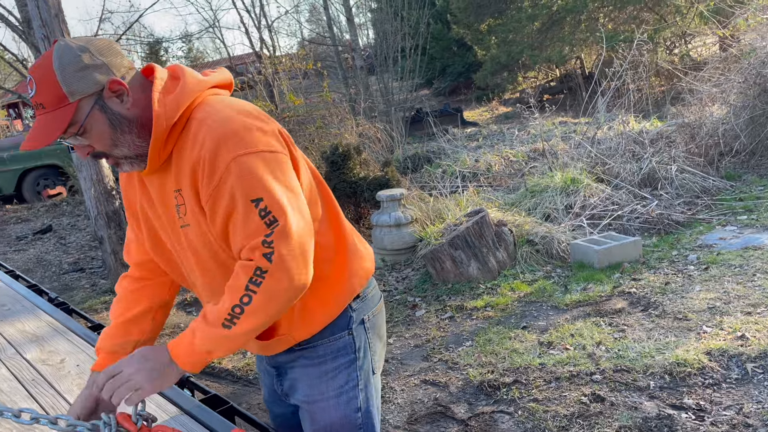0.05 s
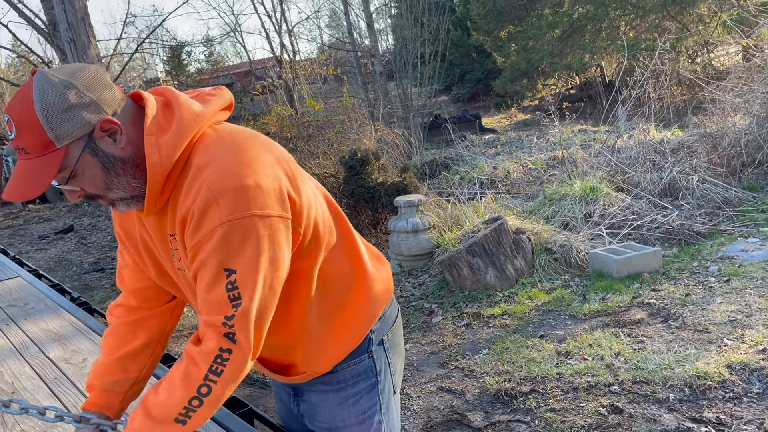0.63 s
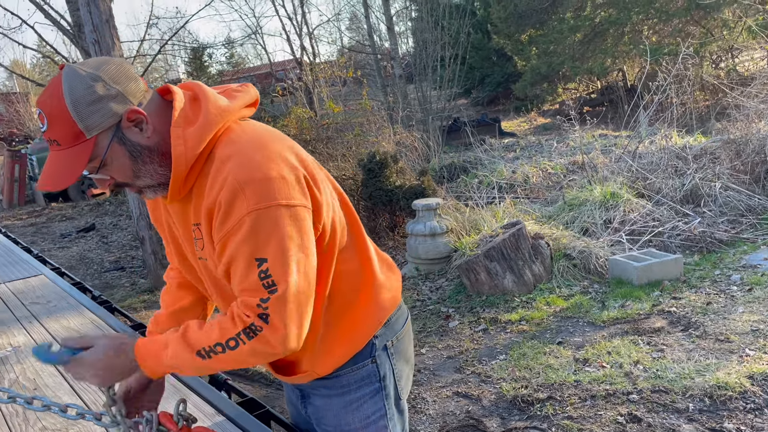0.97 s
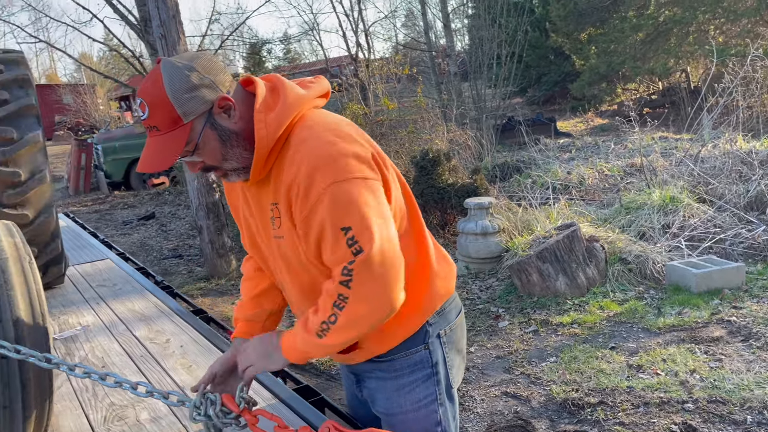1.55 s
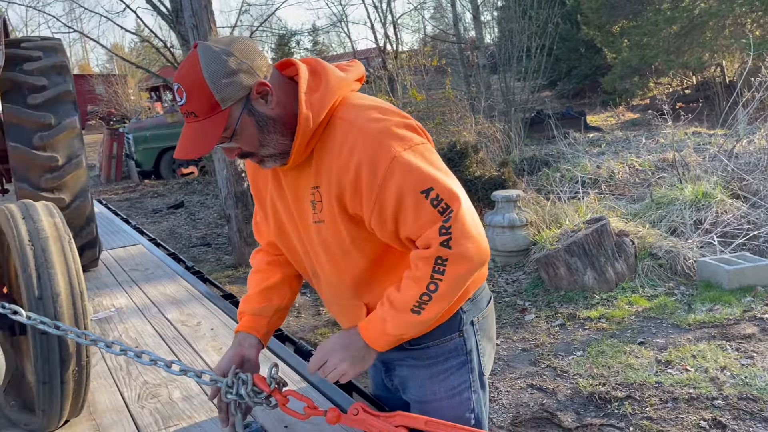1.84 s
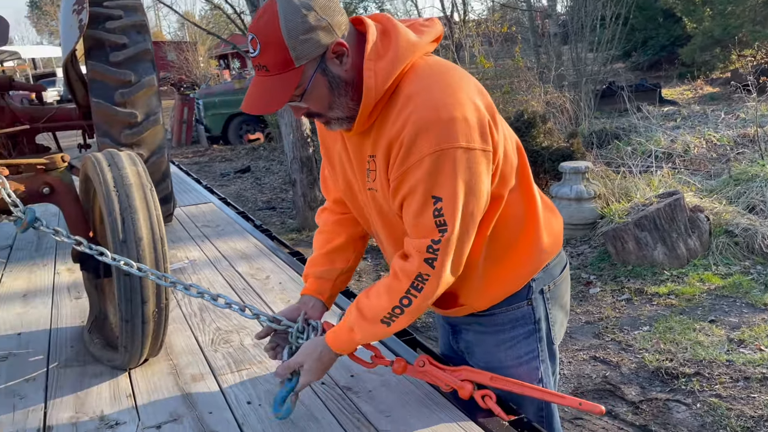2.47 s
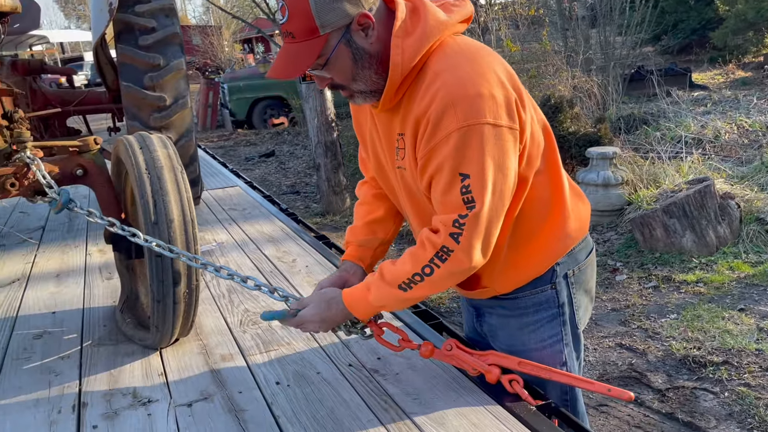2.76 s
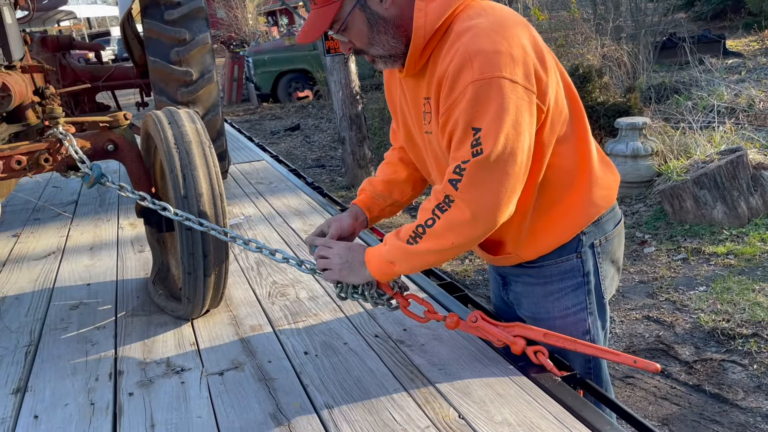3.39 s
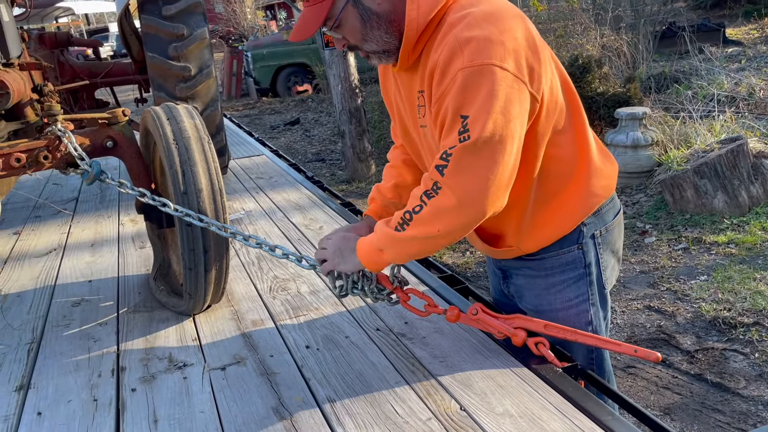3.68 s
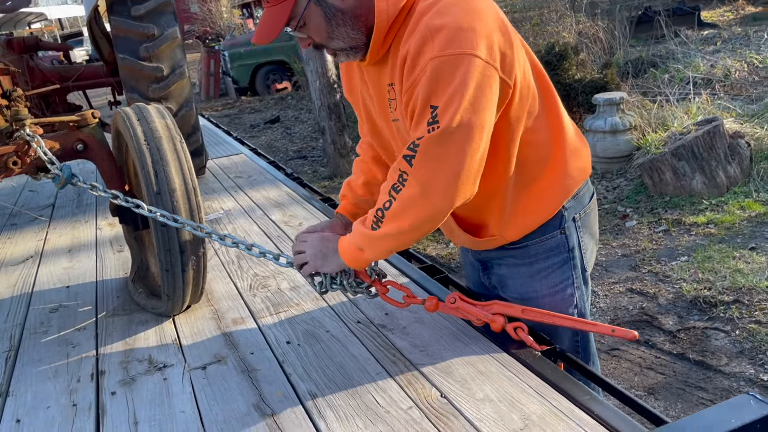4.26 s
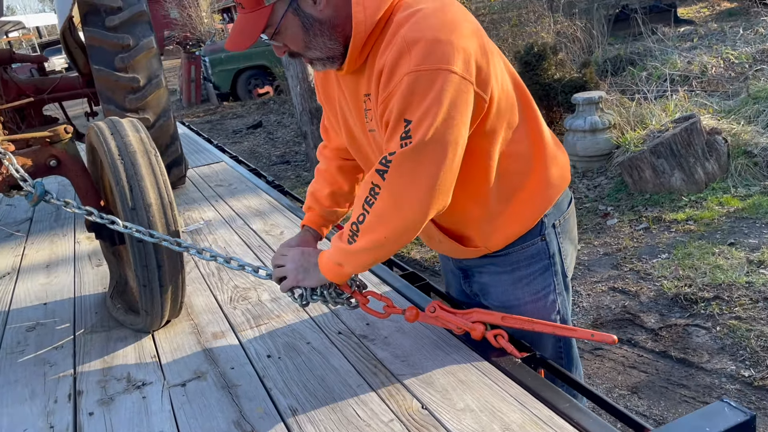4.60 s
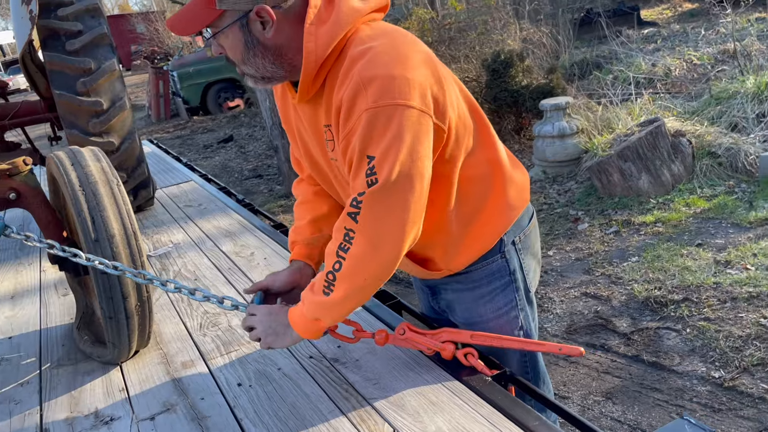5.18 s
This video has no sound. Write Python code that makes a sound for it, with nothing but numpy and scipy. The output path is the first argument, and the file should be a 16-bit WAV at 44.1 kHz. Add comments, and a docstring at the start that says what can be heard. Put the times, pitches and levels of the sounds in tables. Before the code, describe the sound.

A steel tie-down chain is handled close to the microphone, outdoors over a faint low rumble. In the first half second, the chain and binder knock and drag on a wooden trailer deck, which booms hollowly while links clink. Scattered clicks and a short scrape follow between 0.6 and 1.3 seconds. At about 1.35 seconds comes the loudest thump, deep and resonant, with smaller knocks and bright jingling until 1.7 seconds. A sharp metal clank lands at 2 seconds amid soft knocks and the rubbing of hands along the chain. After a quieter moment, another crisp clink sounds at 3 seconds, then lighter irregular clicks from 3.5 to 4.5 seconds, the hook ringing briefly after each contact. A small rattle and scrape around 4.8 seconds and a few light ticks close it.

```python
"""Outdoors at a wooden trailer deck, close up on a phone's two microphones.
A steel tie-down chain is handled and hooked up: held links click, free links ring, sliding links
scrape, and the hook and binder sing briefly after each contact. The heavy chain and binder knock
and drag on the deck, which booms with bending waves. Faint open-air rumble lies underneath."""
import sys
import numpy as np
from scipy import signal
from scipy.fft import rfft, irfft, next_fast_len
from scipy.io import wavfile

SR = 44100
rng = np.random.default_rng(int(sys.argv[2]) if len(sys.argv) > 2 else 0)


def put_to_file(sound):
    """Save the sound as 16-bit audio at rate SR, in the file named by the first command-line argument."""
    columns = np.atleast_2d(sound).T  # one column per channel
    safe = np.clip(columns, -1, 1)
    whole_steps = np.round(safe * 32767)
    wavfile.write(sys.argv[1], SR, whole_steps.astype(np.int16))


N = 230904

# links, and twice the hook, left free to ring: t/s, level/dB, t60/s, lead mode/Hz, second mode/Hz
FREE_RINGS = [(.092, -41.5, 0.13, 4400, 6350), (.174, -25, 0.037, 4410, 8500),
              (.273, -41, 0.067, 4390, 4880), (.453, -51, 0.44, 11600, 8210),
              (.455, -52.5, 0.37, 4440, 4740), (.528, -29.5, 0.032, 4860, 6530),
              (1.050, -30.5, 0.017, 13100, 8900), (1.358, -41, 0.093, 9300, 14500),
              (1.454, -46, 0.22, 4387, 6600), (1.486, -38.5, 0.079, 9050, 11630),
              (1.512, -34, 0.052, 9300, 11200), (1.513, -52.5, 0.5, 4420, 4840),
              (1.634, -48.5, 0.13, 9400, 11350), (1.671, -56.5, 0.064, 4470, 9470),
              (2.036, -44, 0.14, 4530, 6780), (2.036, -55, 0.13, 14400, 10300),
              (2.141, -45, 0.13, 4880, 10100), (2.214, -62, 0.091, 6630, 4387),
              (2.333, -38, 0.042, 8750, 9400), (3.017, -25, 0.043, 11487, 4850),
              (3.048, -33.5, 0.043, 4360, 11100), (3.120, -54, 0.026, 11487, 4960),
              (3.550, -36, 0.06, 4680, 9500), (3.790, -35, 0.039, 3055, 2420),
              (3.893, -36.5, 0.024, 2116, 2580)]
# modes of the deck: f/Hz, level/dB, t60/s
DECK_MODES = [(124.97, -1.5, 0.91), (208, -27, 0.27), (247.4, 1.5, 0.64), (310, -9.5, 0.22),
              (413, -8.5, 0.76), (465, -4, 0.25), (563, -7, 0.46), (698, -0.5, 0.22), (840, -3.5, 0.14),
              (850, -8.5, 0.28), (1240, 1.5, 0.069), (1307, -11, 0.33), (1620, -17, 0.34)]
# spectrum of the booming deck: f/Hz, level/dB
BOOM_SPECTRUM = [(40, -21), (85, -13), (125, 2.5), (160, -2), (190, 2), (245, 6.5), (450, -4.5), (900, -3),
                 (1500, -4.5), (2500, -9), (5000, 2)]
# short-lived modes of the hook and binder: f/Hz, level/dB
HOOK_MODES = [(2170, 0), (2420, -8), (2840, -8.5), (3010, -3), (3130, -2.5), (3350, -7.5), (6590, -34.5)]


def undb(db):
    """Decibels to gain."""
    return 10 ** (np.asarray(db) / 20)


def unit(x):
    """Scale to rms 1."""
    return x / np.sqrt(np.mean(x ** 2) + 1e-20)


def seconds(length):
    """Time axis of the given length."""
    return np.arange(int(length * SR)) / SR


def fade(t, t60):
    """Exponential decay by 60 dB in t60."""
    return np.exp(-np.log(1000) * t / t60)


def read(table, hz):
    """Read (f/Hz, value) points on a log-frequency axis."""
    points, values = np.transpose(table)
    return np.interp(np.log(hz + 1), np.log(points), values)


def shape(x, response):
    """Filter by a function of frequency."""
    size = next_fast_len(2 * x.shape[-1])
    hz = np.arange(size // 2 + 1) * SR / size
    return irfft(rfft(x, size) * response(hz), size)[..., :x.shape[-1]]


def colour(x, table):
    """Causal filter with the given (f/Hz, level/dB) curve, built from its cepstrum."""
    def response(hz):
        cepstrum = irfft(np.log(undb(read(table, hz))))
        cepstrum[1:len(cepstrum) // 2] *= 2
        cepstrum[len(cepstrum) // 2 + 1:] = 0
        return np.exp(rfft(cepstrum))
    return shape(x, response)


def noise(size):
    """Noise with a flat spectrum and random phases."""
    return unit(irfft(np.exp(2j * np.pi * rng.random(size // 2 + 1)), size))


def stereo(mid, other):
    """Left and right from a common sound and an unrelated one."""
    # how unlike the two microphones hear a sound: f/Hz, side minus mid/dB
    width = [(50, -13), (130, -22), (380, -19), (600, -8), (1200, -8), (3000, -7), (6000, -11),
             (12000, -17)]
    side = colour(other, width)
    return np.array([mid + side, mid - side])


def grainy(grain_db, size):
    """Stereo noise whose level jumps every size samples."""
    grains = undb(grain_db * np.repeat(rng.standard_normal(N // size + 1), size)[:N])
    return stereo(noise(N) * grains, noise(N) * grains)


def ring(t, hz, t60):
    """One struck mode."""
    return np.sin(2 * np.pi * hz * t + 2 * np.pi * rng.random()) * fade(t, t60)


def add(out, s, x):
    """Mix x into out from time s on."""
    start = max(int(s * SR), 0)
    x = x[..., :max(N - start, 0)]
    out[..., start:start + x.shape[-1]] += x


def open_air(level_db=-51.5):
    """The bed of the location: low outdoor rumble with a thin hiss."""
    # spectrum of the air: f/Hz, relative level/dB
    spectrum = [(25, -26.5), (60, 6), (125, 4), (240, -9), (450, -18), (1000, -34), (1800, -32),
                (2600, -35.5), (4500, -49), (9000, -43.5), (12000, -38), (14000, -45), (16000, -62)]
    return undb(level_db) * unit(colour(stereo(noise(N), noise(N)), spectrum))


def hand_strokes(attack_s=0.038, release_s=0.089, sag_db=-16.5):
    """Strength of the rubbing over time: each stroke starts quickly, sags as it slows and lets go."""
    # hands drawing along the chain: t/s, length/s, level/dB
    strokes = [(0, 1, -59), (0.632, 0.099, -62.5), (0.807, 1, -63), (1.305, 0.24, -54.5),
               (1.9, 0.48, -49.5), (2.326, 0.546, -55), (3.587, 0.1, -56), (4.55, 0.88, -70.5)]
    out = np.zeros(N)
    for s, length, db in strokes:
        t = seconds(length)
        edges = np.clip(np.minimum(t / attack_s, (length - t) / release_s), 0, 1)
        add(out, s, edges * undb(db + sag_db * t / length))
    return out


def drag_and_rub(rub, drag_db=-3, drag_top_hz=480):
    """The shifting chain keeps the deck murmuring while links, hands and sleeves rub finely."""
    # how much the chain shifts on the deck: t/s, level/dB
    shifting = [(0.0, -36), (0.34, -27), (0.57, -45.5), (1.02, -46), (1.36, -41.5), (1.53, -27),
                (1.66, -37.5), (2.84, -54), (3.69, -50.5), (4.33, -59), (4.71, -40.5), (5.24, -60)]
    # spectrum of the rubbing: f/Hz, level/dB
    rub_spectrum = [(400, 7), (900, 13.5), (1900, 5.5), (2400, 14.5), (3000, 1.5), (3500, 7.5), (4300, 0.5),
                    (7000, -10.5), (9000, -4.5), (12000, -4), (14000, -15), (16000, -11.5)]
    drag = undb(drag_db + np.interp(np.arange(N) / SR, *np.transpose(shifting)))
    jolts, slips = grainy(4, size=400), grainy(3, size=48)
    murmur = shape(colour(jolts, BOOM_SPECTRUM), lambda hz: 1 / (1 + (hz / drag_top_hz) ** 2))
    return drag * unit(murmur) + rub * unit(colour(slips, rub_spectrum))


def bending_wave(t, travel_s=0.005554, echo_s=.0042, echo_db=-1.0, scatter_db=-2):
    """A blow and its echoes from the plank ends; bending waves carry highs faster than lows."""
    # spectrum of the first wave: f/Hz, level/dB
    spectrum = [(40, -33.5), (110, -10.5), (190, -7.5), (320, -4.5), (420, 6), (490, 6.5), (620, -11),
                (850, 2), (1100, -9.5), (1400, -9), (2500, -19), (5000, -11.5)]
    push = np.zeros(len(t))
    for k in range(4):
        add(push, k * echo_s * rng.uniform(0.9166, 1.0), undb([k * echo_db]) * rng.choice([-1, 1]))
    scatter = noise(len(t)) * fade(t, 0.17)
    push += undb(scatter_db) * scatter / np.linalg.norm(scatter)
    # each frequency is delayed by travel_s * (sqrt(500 / hz) - 1 / 3)
    dispersed = shape(push, lambda hz: np.exp(-2j * np.pi * travel_s * (2 * np.sqrt(500 * hz) - hz / 3)))
    return colour(dispersed, spectrum)


def deck_boom(t):
    """Dense plank and frame vibration, in octave bands; the lows outlast the highs."""
    # decay of the boom: f/Hz, t60/s
    decay = [(120, 1), (250, 0.29), (500, 0.44), (1000, 0.28), (3000, 0.12)]
    hiss, out = noise(len(t)), 0
    for centre in 62.5 * 2. ** np.arange(8):
        band = shape(hiss, lambda hz: np.clip(1 - abs(np.log2((hz + 1) / centre)), 0, 1))
        out = out + band * fade(t, read(decay, centre))
    return colour(out, BOOM_SPECTRUM)


def deck_knocks(soft_db=-32.5, boom_sag=0.55, modes_db=-4, leak_db=-48):
    """Each knock sends a bending wave through the deck and leaves it booming; soft ones boom more."""
    # chain and binder landing on the deck: t/s, level/dB, treble cutoff of the contact/Hz
    knocks = [(0.035, -21.5, 510), (.082, -19, 880), (.196, -24.5, 606), (.236, -23.5, 620),
              (.266, -14.5, 1300), (0.297, -26.5, 756), (0.397, -36, 350), (.441, -33, 445),
              (0.467, -34, 450), (0.858, -54, 1060), (1.215, -52.5, 1510), (1.349, -8.5, 1190),
              (1.391, -24.5, 780), (1.508, -26, 1200), (1.582, -21.5, 497), (1.616, -27, 482.4),
              (1.945, -32, 560), (2.001, -34.5, 480), (2.084, -37, 423), (2.421, -41.5, 644),
              (3.057, -37, 327.5), (5.154, -40, 477)]
    out, t = np.zeros((2, N)), seconds(.9)
    onset = int(.02 * SR)
    for s, db, top_hz in knocks:
        boom_db = -0.5 - boom_sag * (db - soft_db)  # relative to the first wave
        modes = sum(undb(d + 1.4 * rng.standard_normal()) * ring(t, f, t60) for f, d, t60 in DECK_MODES)
        wave = stereo(bending_wave(t), bending_wave(t))
        boom = stereo(deck_boom(t), deck_boom(t))
        contact = signal.butter(4, top_hz, fs=SR, output="sos")
        for part, part_db in [(wave, 0), (boom, boom_db), (np.array([modes, modes]), boom_db + modes_db)]:
            dulled = signal.sosfilt(contact, part) + undb(leak_db) * part
            add(out, s, undb(db + part_db) * dulled / np.sqrt(np.mean(dulled[:, :onset] ** 2)))
    return out


def link_contacts(rub, idle_db=-76, scatter_db=3, stray_count=34):
    """List the snaps, the tick that starts each ring, and stray ticks whose level follows the rubbing."""
    # held links snapping together: t/s, level/dB, relative low-mids/dB, relative treble/dB
    snaps = [(.134, -46, -0.5, -2), (.269, -53, -4, 10), (.300, -49.5, -4, 13.5), (.45, -54.5, 16.5, 12),
             (.647, -55, -1, -0.5), (.683, -52, 0.5, -4), (.703, -45.5, -1, -6), (.859, -37.5, -11, -5.5),
             (1.051, -38, 0, 5.5), (1.214, -47, 6, -11), (1.256, -41, 1, 1.5), (1.357, -35.5, 23.5, -4),
             (1.756, -50.5, -1, -11), (1.902, -55, 15, -5), (2.026, -45.5, 15, 1), (2.0347, -28.5, -6, 3.5),
             (2.334, -48, -3, -14), (2.424, -60.5, 16.5, 12.5), (2.892, -66, -13.5, 14.5),
             (2.908, -58, 1, 16), (3.018, -36.5, -7, -2.5), (3.0445, -42, 13.5, 8.5), (3.212, -50.5, 7, -8),
             (3.267, -62, -6, 13), (3.358, -69.5, -3, 27.5), (3.411, -55.5, 1, 1), (3.551, -47.5, 13.5, 13),
             (3.563, -41, 3, -1.5), (3.638, -50.5, 2.5, -8), (3.789, -41, 5.5, 0.5),
             (3.8915, -48.5, 8.5, -7.5), (4.196, -47.5, -5, 12.5), (4.221, -63, 23, -9),
             (4.4225, -60, 22, -8.5), (4.523, -56.5, 19.5, -3.5), (4.690, -42.5, 10.5, -12.5),
             (4.758, -41, 7, 0.5), (4.819, -50, -7, 5), (5.032, -55.5, -2, 15), (5.045, -63, -23, 15.5),
             (5.151, -51, 19, -0.5), (5.191, -66.5, 21, 17), (5.207, -47.5, -25, 4)]
    # a tick grows more slowly than its ring
    ticks = [(s, -35.5 + 0.35 * db, 0.5, -14.5) for s, db, *_ in FREE_RINGS]
    strays = []
    for when, force, tilt in rng.random((stray_count, 3)):
        db = 20 * np.log10(undb(-2) * rub[int(when * N)] + undb(idle_db))
        db += scatter_db * (2 * force - 1)
        strays.append((when * N / SR, db, -10, 5 + scatter_db * (2 * tilt - 1)))
    return snaps + ticks + strays


def link_clicks(contacts, level_db=-4.5, firm_db=-40, rise_s=0.00039, hook_db=-9):
    """A hard crack, then micro-bounces as the links seat (less after a firm snap); the hook rings."""
    out, t = np.zeros((2, N)), seconds(.09)
    hz = np.geomspace(300, 16000, 120)
    crack = unit(fade(t, t60=0.007) * (1 - np.exp(-t / rise_s)))
    for s, db, low_db, top_db in contacts:
        grains = undb(5 * np.repeat(rng.standard_normal(len(t)), 24)[:len(t)])
        chatter = grains * fade(t, t60=0.068) * (1 - fade(t, t60=0.016))
        force = crack + undb(-1.1 * max(db - firm_db, 0)) * unit(chatter)
        tone = [(300, low_db + 2.5), (1200, low_db - 3), (2400, low_db - 5), (4500, -2.5), (7500, -3),
                (11500, top_db), (14000, top_db - 7), (16000, top_db - 10)]
        # a gripped link has heavily damped resonances, different at every point of contact
        resonances_db = 4 * rng.standard_normal(len(hz))
        burst = stereo(noise(len(t)) * force, noise(len(t)) * force)
        click = colour(burst, np.transpose([hz, read(tone, hz) + resonances_db]))
        # the first 10 ms between 3.5 and 9 kHz set the level
        bite = shape(click, lambda f: (f > 3500) & (f < 9000))[:, :SR // 100]
        click /= np.sqrt(np.mean(bite ** 2))
        hook = sum(undb(d + 7.4 * rng.standard_normal((2, 1))) * ring(t, f, t60=0.089)
                   for f, d in HOOK_MODES)
        add(out, s, undb(db + level_db) * (click + undb(hook_db + min(low_db, 3)) * hook))
    return out


def link_rings(rise_s=0.00047, second_db=-4, others_db=-16, detune=0.0028, mic_scatter_db=3.5):
    """Where a link is struck decides which two modes lead; its neighbour rings slightly off pitch."""
    # modes of one link: f/Hz, level/dB
    link_modes = [(4387, 7.5), (4850, 11.5), (6535, 2), (8250, -1), (9000, 5), (10065, 6.5), (11500, 4.5),
                  (13560, -4.5), (14400, -18), (14990, -10)]
    out, t = np.zeros((2, N)), seconds(.35)
    for s, db, t60, lead_hz, second_hz in FREE_RINGS:
        modes = [(lead_hz, 0), (second_hz, second_db)]
        modes += [(f * (1 + detune * rng.standard_normal()), d + others_db) for f, d in link_modes]
        chime = 0
        for hz, mode_db in modes:
            neighbour = undb(-6) * ring(t, hz * (1 + 0.0031 * rng.standard_normal()), t60 / 2)
            mic_gains = undb(mode_db + mic_scatter_db * rng.standard_normal((2, 1)))
            chime = chime + mic_gains * (ring(t, hz, t60) + neighbour)
        choke = np.exp(-(t / (0.94 * t60)) ** 4)  # the link soon settles against the next one
        add(out, s, undb(db) * chime * (1 - np.exp(-t / rise_s)) * choke)
    return out


def hook_after_ring(steel, level_db=-21, t60=0.17, spread=0.054, cluster_size=7):
    """Every contact sets the hook and binder briefly singing in clusters of close modes."""
    t = seconds(.8)
    mid, side = [sum(undb(d) * ring(t, f * (1 + spread * rng.standard_normal()), t60)
                     for f, d in HOOK_MODES * cluster_size) for _ in range(2)]
    body = stereo(mid, side) / np.linalg.norm(mid)
    return undb(level_db) * signal.fftconvolve(steel, body, axes=1)[:, :N]


def yard_echoes(steel, wet_db=-19, t60=0.31, top_db=-9):
    """Weak scattered echoes reach the microphones from the deck, the tractor and the trees."""
    t = seconds(.5)
    tail = stereo(noise(len(t)), noise(len(t))) * fade(t, t60) * (1 - fade(t, 0.066))
    tail = colour(tail / np.linalg.norm(tail[0]), [(2500, 0.018), (6000, top_db / 2), (13000, top_db)])
    return undb(wet_db) * signal.fftconvolve(steel, tail, axes=1)[:, :N]


def anchor_tugs(steel, level_db=-7, modes_db=-4, top_hz=1100, delay_s=0.00398):
    """The taut chain carries every contact to its anchor, where the deck thuds and rings on."""
    t = seconds(.6)
    lowpass = signal.butter(4, top_hz, fs=SR, output="sos")
    thud = signal.sosfilt(lowpass, stereo(deck_boom(t), deck_boom(t)))
    modes = sum(undb(d) * ring(t, f, t60) for f, d, t60 in DECK_MODES)
    deck = thud / np.linalg.norm(thud[0]) + undb(modes_db) * modes / np.linalg.norm(modes)
    out = np.zeros((2, N))
    add(out, delay_s, signal.fftconvolve(steel.mean(axis=0, keepdims=True), deck, axes=1))
    return undb(level_db) * out


def link_scrapes():
    """Sliding steel catches and slips in dense, uneven grains."""
    # links sliding over steel: t/s, length/s, level/dB
    slides = [(0.636, 0.13, -51), (2.864, 0.17, -65.5), (3.393, 0.071, -56.5), (4.605, 0.038, -54.5),
              (4.791, 0.11, -42.5)]
    # spectrum of the scraping: f/Hz, level/dB
    spectrum = [(400, 9), (1000, 10.5), (1800, 0), (2200, 6), (2700, 5.5), (3200, 3), (4500, 2),
                (7000, -12), (11500, -1), (15000, -27.5)]
    push = np.zeros(N)
    for s, length, db in slides:
        add(push, s, undb(db) * np.hanning(int(length * SR)) ** .5)
    return push * unit(colour(grainy(5, size=60), spectrum))


def weight_bumps(length_s=0.0704):
    """Shifting weight gives a few slow cycles of low rumble."""
    # soft bumps: centre t/s, f/Hz, level/dB
    bumps = [(1.305, 65.6, -28), (1.36, 47.3, -33), (1.65, 53.3, -29.5), (3.721, 91, -47.5)]
    out, t = np.zeros((2, N)), seconds(length_s)
    for s, hz, db in bumps:
        add(out, s - length_s / 2, undb(db) * np.hanning(len(t)) * np.sin(2 * np.pi * hz * t))
    return out


def phone_body(near):
    """The phone's body shades the two microphones and shifts the phase between them."""
    # shading of the microphones: f/Hz, left minus right/dB
    balance = [(120, .5), (500, -1.5), (1100, -2.8), (2200, -2), (4400, 2.6), (8000, -.4), (12000, -.8)]
    # how far the left microphone trails the right: f/Hz, phase/rad
    lag = [(100, 0), (1400, .1), (2500, -.5), (3800, -1.2), (4900, -1.1), (5700, .8), (6600, 1.1),
           (7700, 2.7), (9500, 3.5), (12400, 5.8), (16000, 6.5)]
    left = shape(near[0], lambda hz: undb(read(balance, hz) / 2) * np.exp(-1j * read(lag, hz)))
    right = shape(near[1], lambda hz: undb(-read(balance, hz) / 2))
    return np.array([left, right])


def scene():
    """Chain, deck and open air as they arrive at the nearby phone."""
    rub = hand_strokes()
    steel = link_clicks(link_contacts(rub)) + link_rings() + link_scrapes()
    chain = steel + hook_after_ring(steel) + yard_echoes(steel) + anchor_tugs(steel)
    return phone_body(chain + deck_knocks() + drag_and_rub(rub) + weight_bumps() + open_air())


def record(dry, top_hz=15400):
    """The phone rounds the loudest peaks and cuts the top."""
    rounded = dry / (1 + dry ** 6) ** (1 / 6)
    return signal.sosfilt(signal.ellip(8, .2, 70, top_hz, fs=SR, output="sos"), rounded)


dry = scene()
out = record(dry)
put_to_file(out)
```